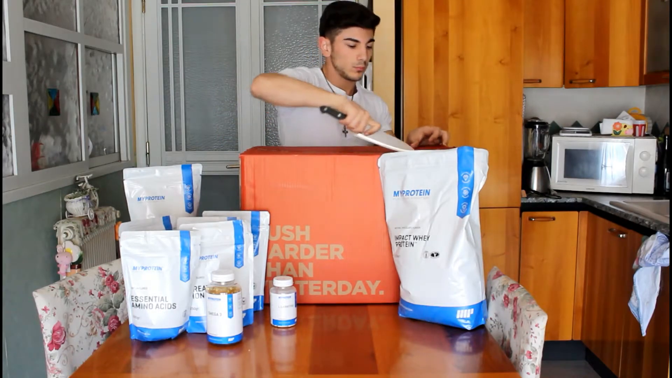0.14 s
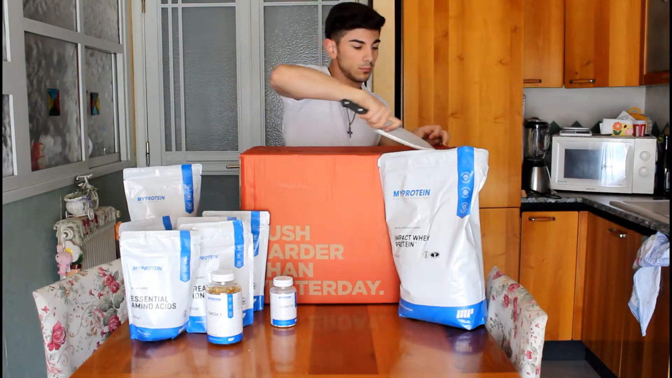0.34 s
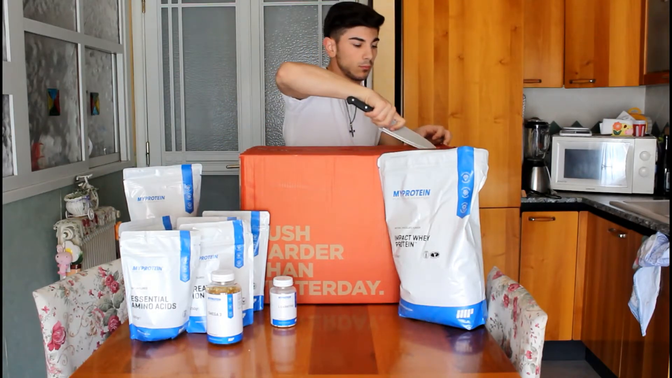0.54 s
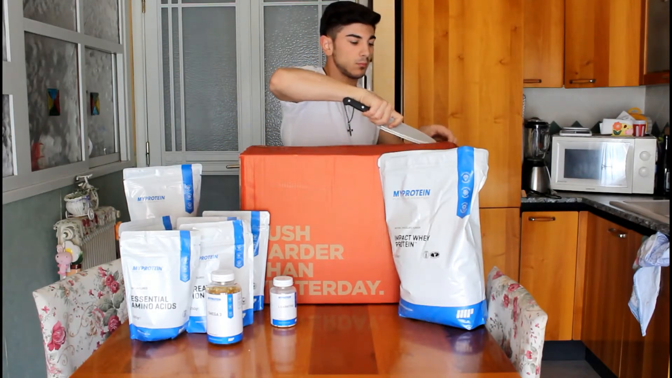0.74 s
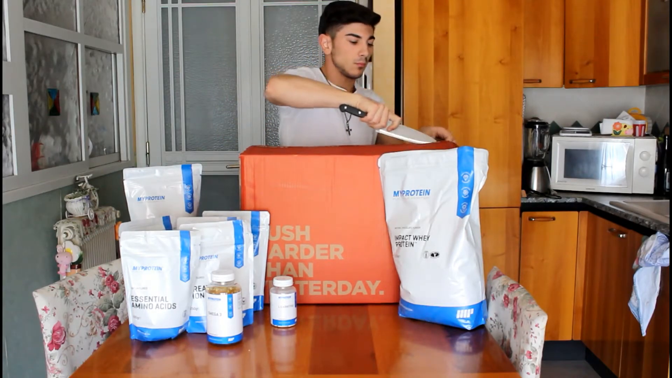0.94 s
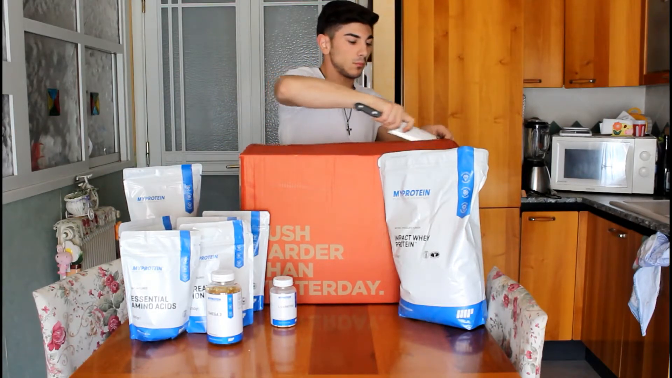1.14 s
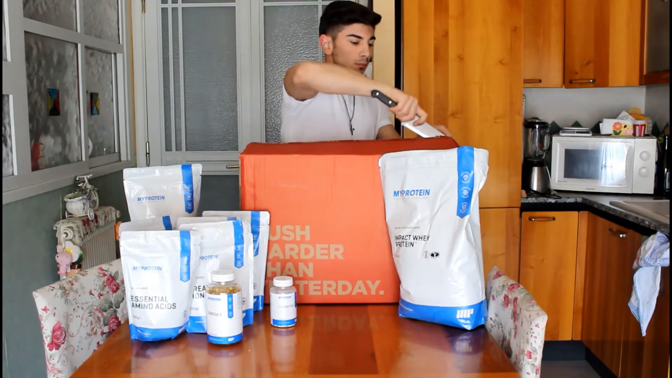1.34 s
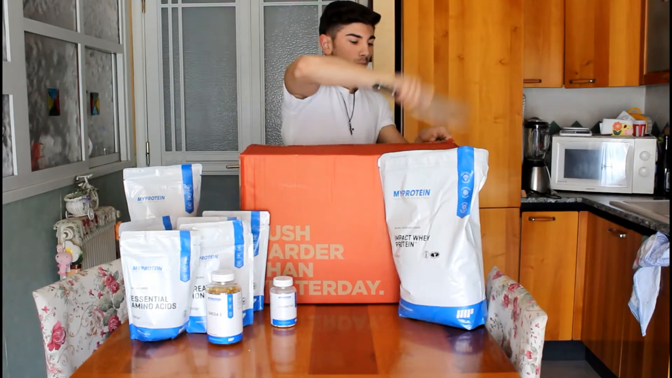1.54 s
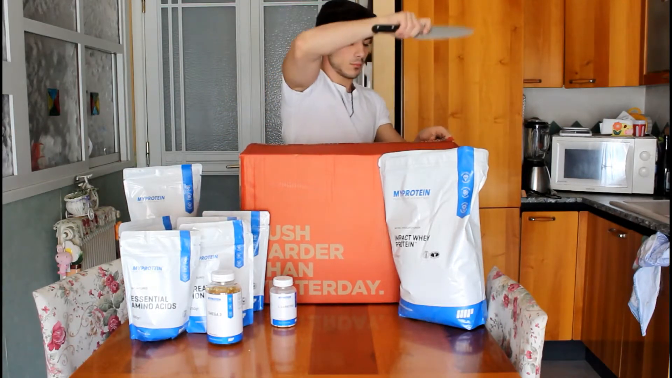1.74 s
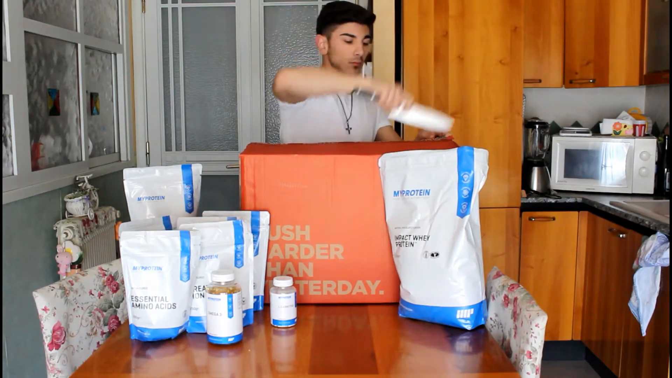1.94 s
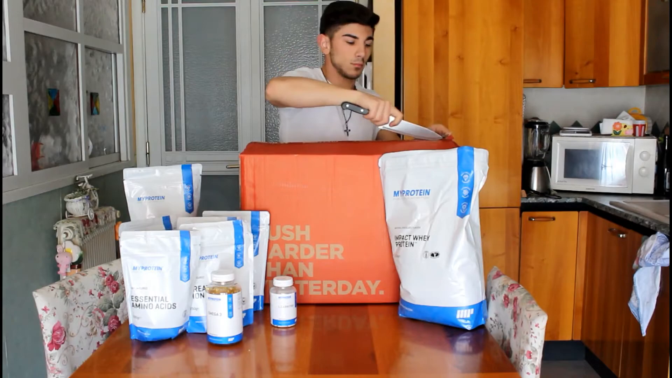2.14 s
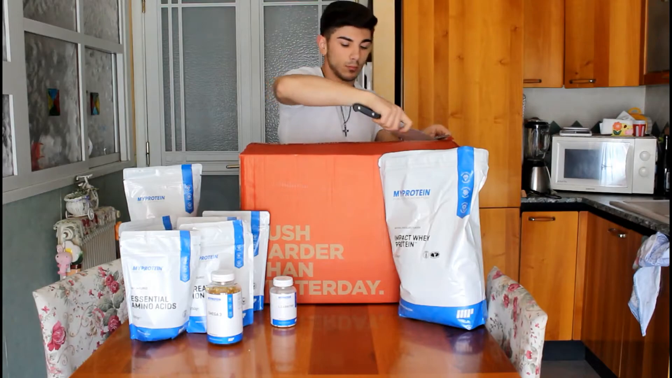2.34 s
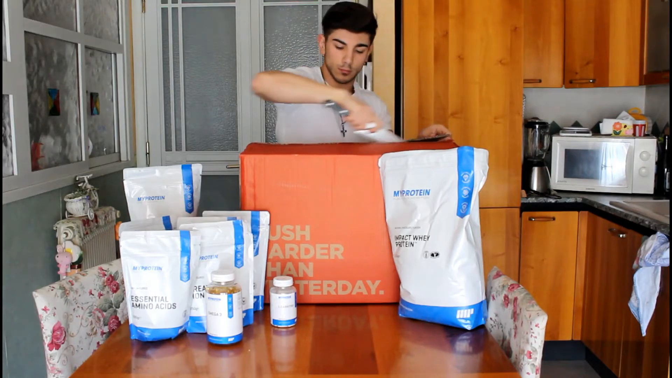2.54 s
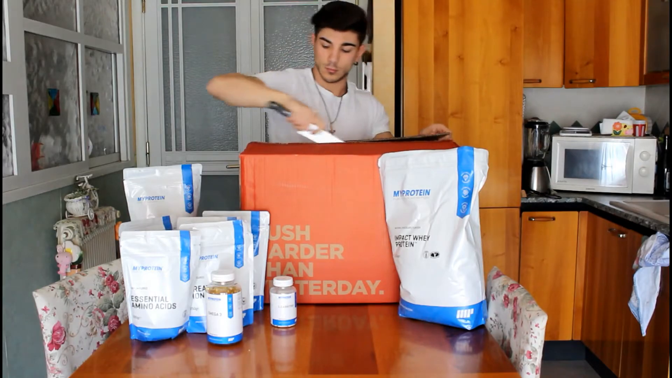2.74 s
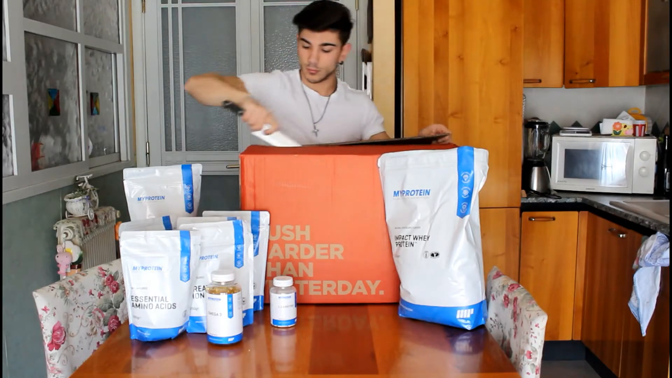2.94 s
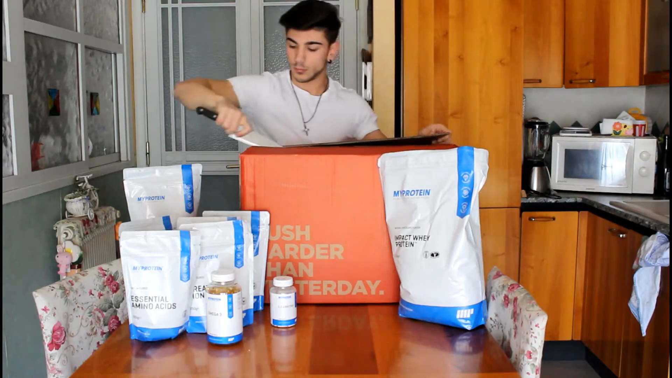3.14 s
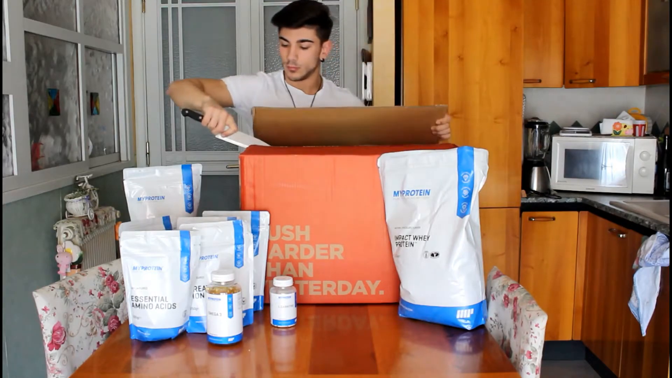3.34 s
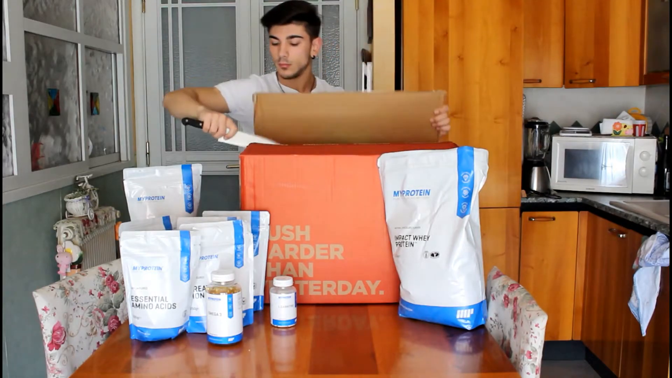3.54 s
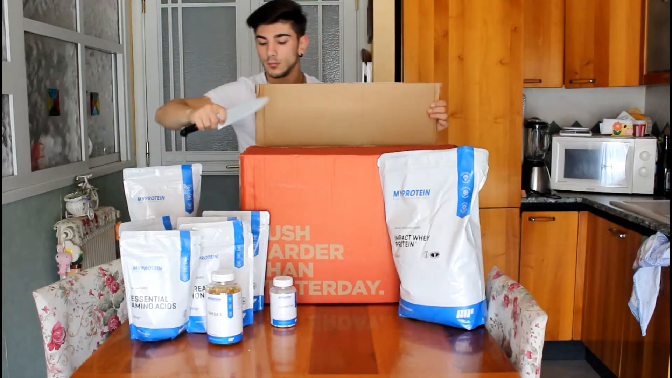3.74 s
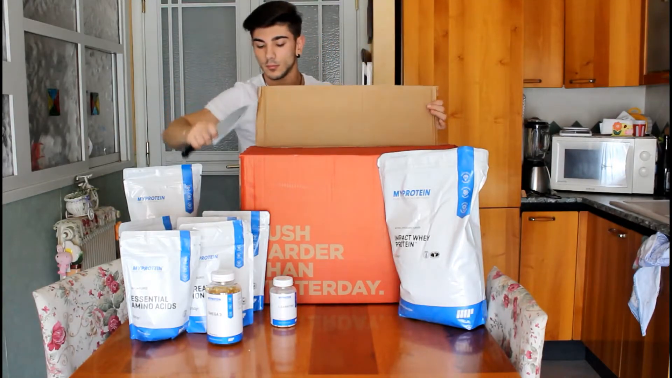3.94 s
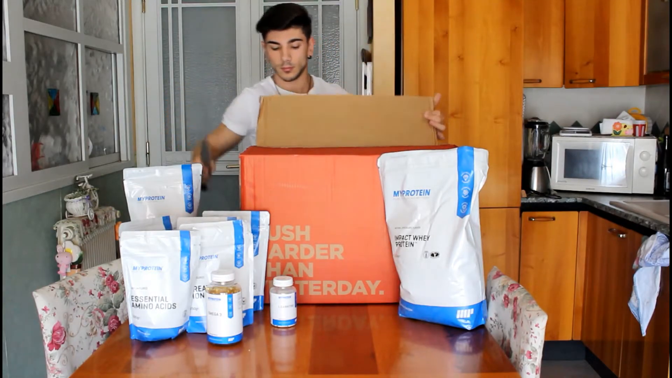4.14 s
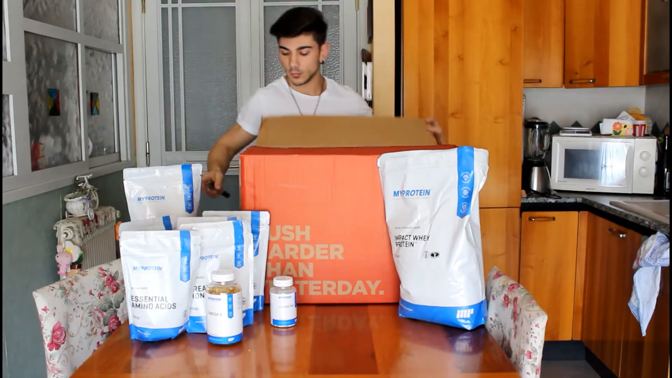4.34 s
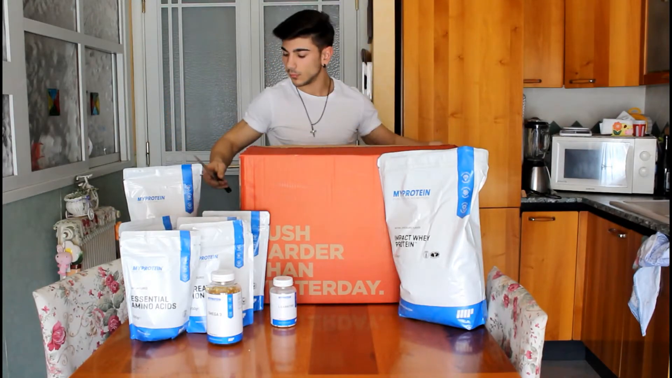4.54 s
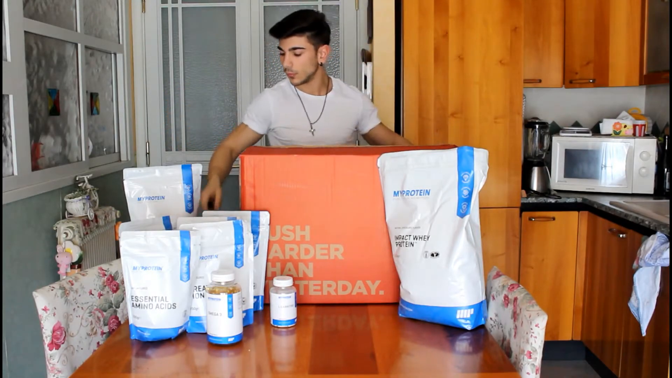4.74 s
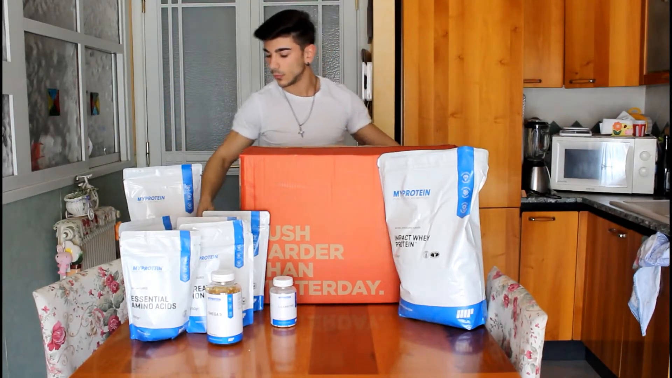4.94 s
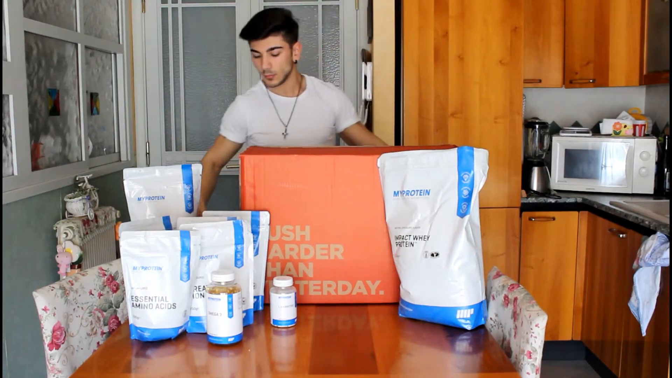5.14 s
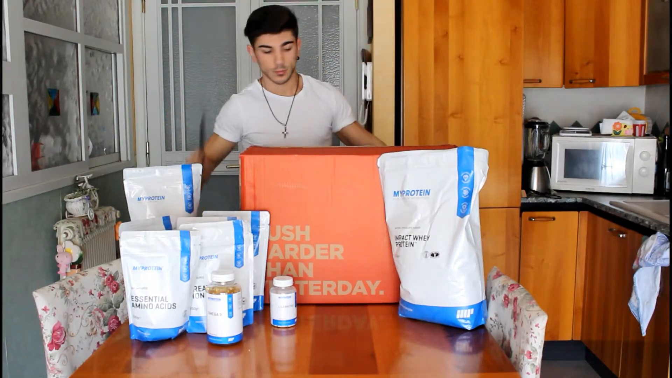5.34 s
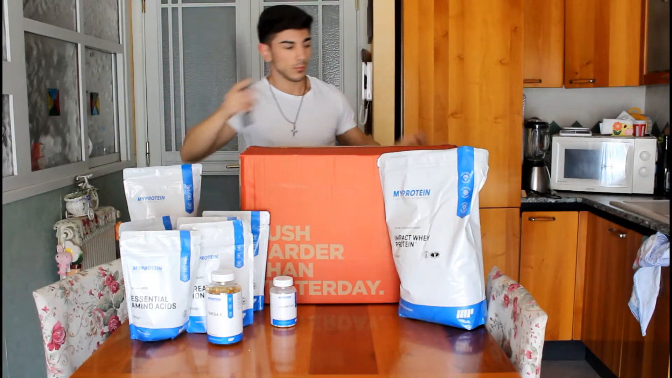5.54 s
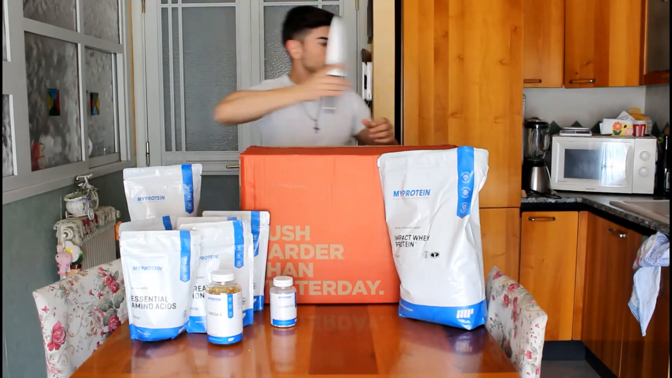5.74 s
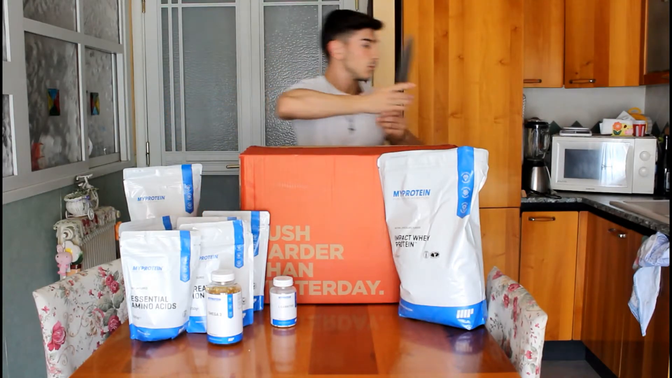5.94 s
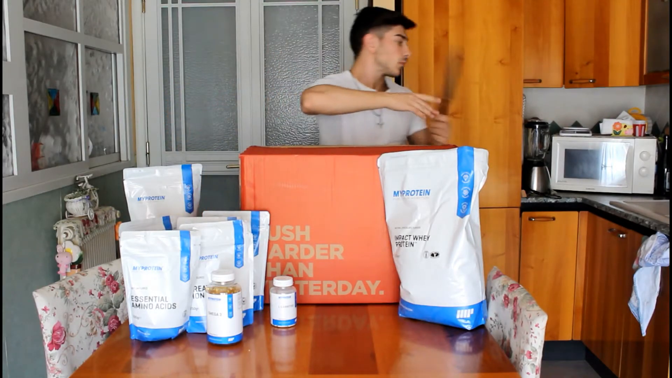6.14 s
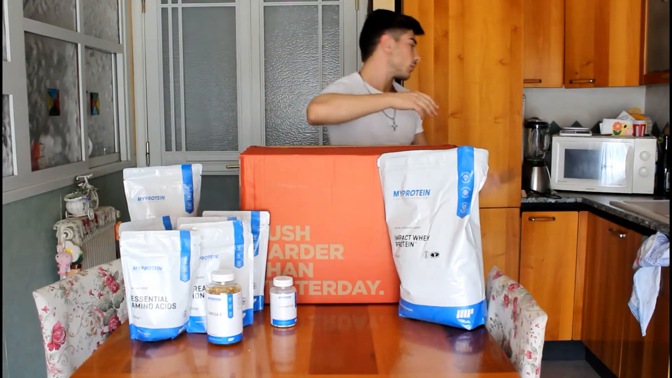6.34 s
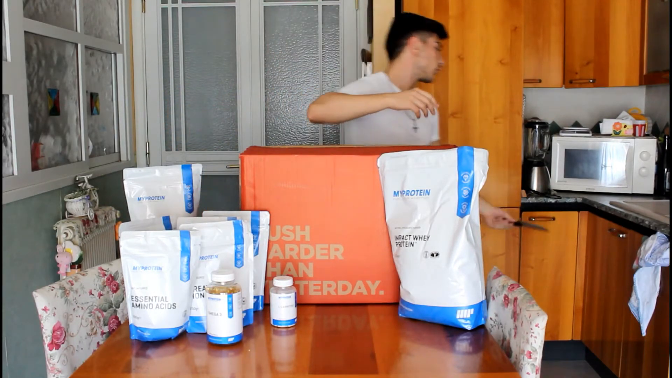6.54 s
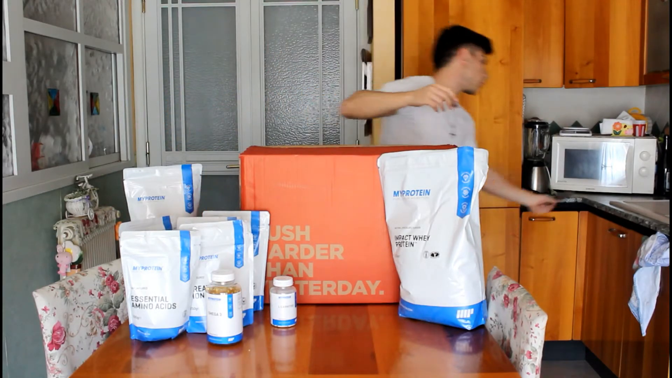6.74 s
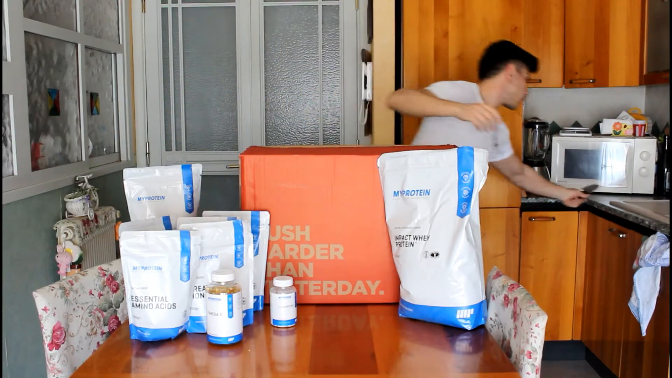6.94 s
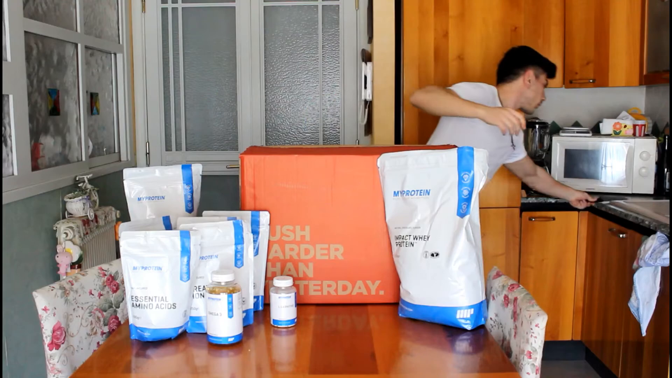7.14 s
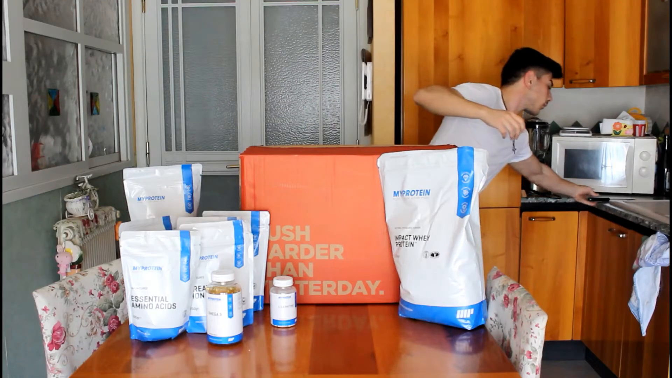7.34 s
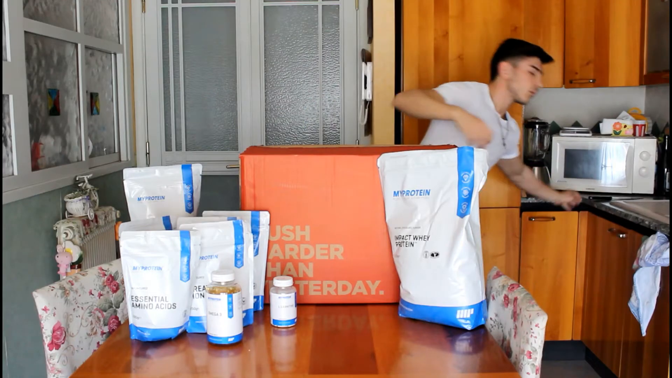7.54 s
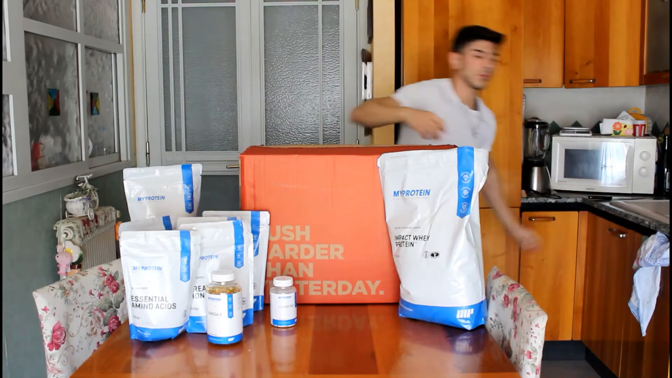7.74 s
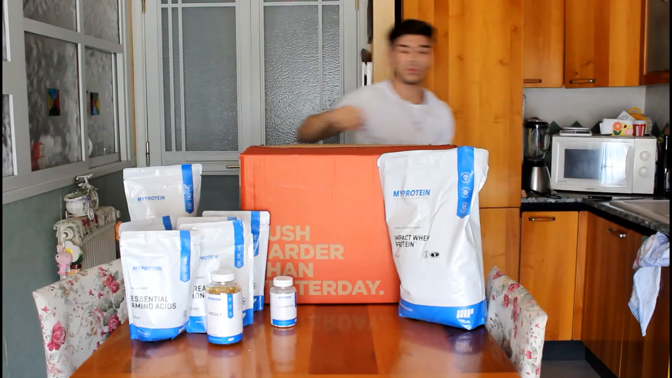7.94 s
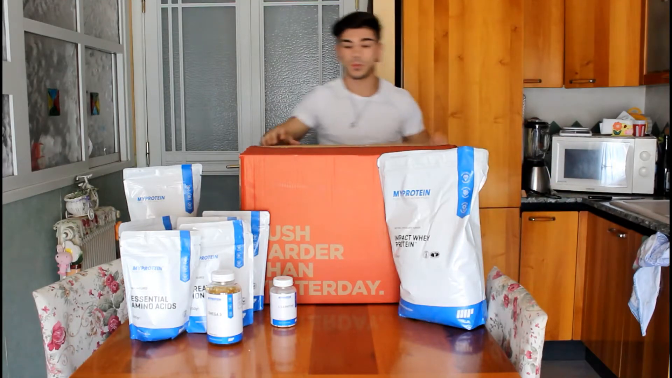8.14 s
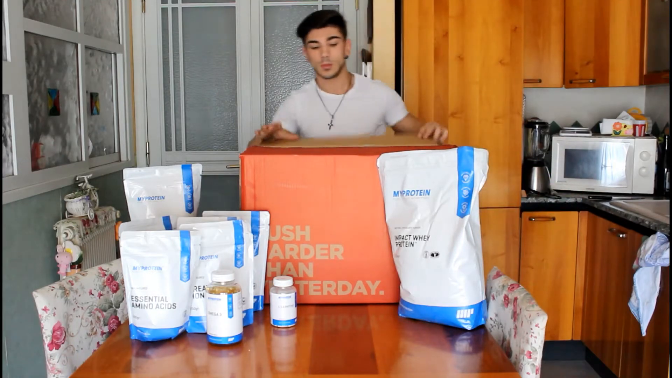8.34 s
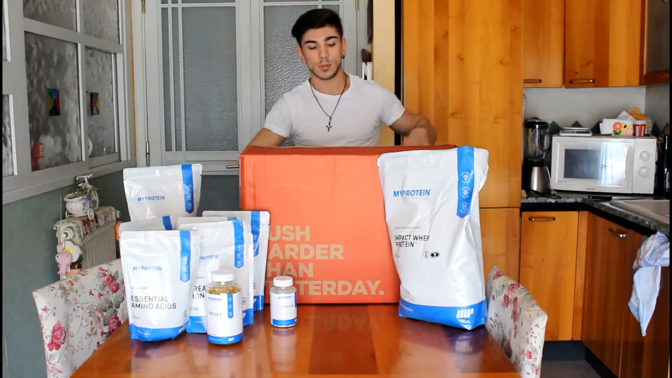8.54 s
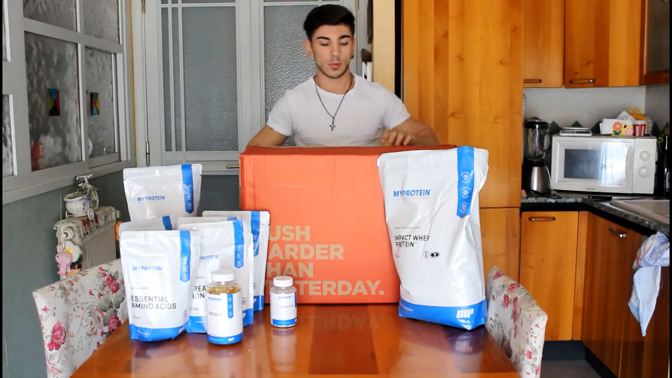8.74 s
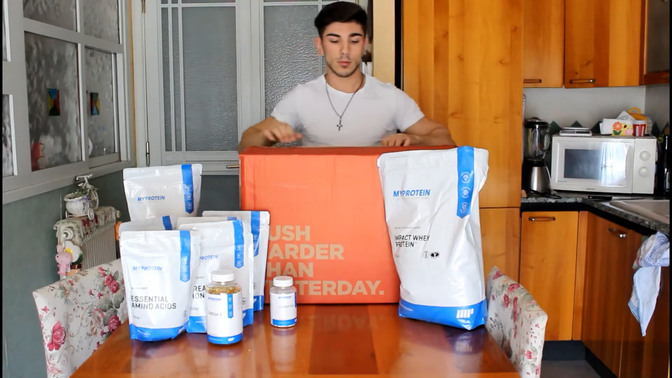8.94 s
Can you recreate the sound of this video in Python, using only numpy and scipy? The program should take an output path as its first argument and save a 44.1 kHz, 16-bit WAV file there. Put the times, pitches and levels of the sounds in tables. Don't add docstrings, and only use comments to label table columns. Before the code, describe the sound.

Loud, abrupt knife blows on a large carton come first, then a dense burst of ripping cuts. Handling drops to quiet rustles and small taps. A hard steel-on-stone clack follows, with rattling rebounds and a short scrape, then hollow cardboard thumps. Heard from about two metres in a reverberant kitchen, over soft room air, faint fridge hum and a passing low engine drone.

```python
import sys
import numpy as np
from scipy import signal
from scipy.fft import rfft, irfft
from scipy.io import wavfile
from scipy.ndimage import uniform_filter1d

SR = 44100
rng = np.random.default_rng(int(sys.argv[2]) if len(sys.argv) > 2 else 0)


def amplitude_ratio(level_db):
    exponent = np.asarray(level_db, float) / 20
    return 10 ** exponent


def file_out(sig):
    cols = np.atleast_2d(sig).T
    lim = np.clip(cols, -1, 1)
    pcm = np.round(lim * 32767).astype(np.int16)
    wavfile.write(sys.argv[1], SR, pcm)


N = 400993

# (time [s], peak [dB], weight [dB], sharpness [dB], crunch length [s])
KNIFE_BLOWS = [(0.4094, -3.5, 3, 0.5, 0.013), (0.428, -10.5, -8, 0, 0.016), (0.45, -15.5, 2.5, 0, 0.007),
               (0.7382, -29.5, 10, -22, 0.01), (0.896, -18, -9.5, -10.5, 0.0068),
               (1.099, -4.5, -6, -1.5, 0.024), (1.215, -11.5, 0.5, -14, 0.022),
               (1.558, -10, 6.5, 0.5, 0.033), (1.9, -54, -15, -23, 0.014),
               (2.0418, -19.5, 8.5, -15.5, 0.02), (2.239, -19, 9, 2.5, 0.027), (2.395, -6.5, -5, -7, 0.017),
               (2.552, -14.5, 8, -1, 0.027), (2.889, -12, 10.5, -4, 0.021), (3.612, -32, 12, -1.5, 0.019),
               (8.175, -19.5, 20.5, 0.5, 0.01), (8.195, -22.5, 17, 9, 0.009),
               (8.458, -25, 15.5, 1.5, 0.027), (8.811, -27, 10, -9.5, 0.023)]
# (start [s], length [s], level [dB], weight [dB], sharpness [dB])
KNIFE_CUTS = [(0, 0.082, -42.5, -6, -3), (0.045, 0.25, -38.5, 0, -3), (0.266, 0.34, -34.5, 1, 4),
              (0.472, 0.18, -27.5, -4.5, -8), (0.717, 0.11, -36, 2, -1), (0.887, 0.2, -37.5, -5, -1),
              (1.125, 0.061, -22, -4.5, -17), (1.171, 0.077, -22.5, 2.5, 1), (1.586, 0.024, -44, 6, 21),
              (1.887, 0.052, -46, -16, -23), (2.256, 0.051, -21, 1, -5), (2.415, 0.19, -23, -5, -6),
              (2.504, 0.041, -17.5, 2, -2.5), (2.544, 0.15, -16.5, 4.5, -5), (2.674, 0.27, -21, 3, -1),
              (2.888, 0.16, -18.5, 3.5, -4), (3.085, .15, -26.5, 7.5, -0.5),
              (3.251, 0.037, -22.5, 3.5, -2.5), (6.225, 0.088, -38.5, -18, 6), (8.176, 0.18, -30.5, 2, 0),
              (8.307, 0.25, -33, 3, 3), (8.77, .04, -46, 5, 10), (8.825, 0.089, -30.5, 3.5, 1),
              (8.961, 0.3, -39.5, -2, 1)]
# (time [s], peak [dB], weight [dB], sharpness [dB], length [s])
SOFT_BUMPS = [(1.566, -17, 6, -12, 0.019), (8.177, -22, 13, -5, 0.037), (4.098, -35.5, -7, -11, 0.017),
              (4.927, -38.5, 0.5, -22, 0.016), (5.5738, -23, -10, 3, 0.0061),
              (5.8974, -19, -2.5, -14, 0.031), (6.1913, -25.5, 0.5, -22, 0.026),
              (6.531, -38.5, -5, -30, 0.019), (6.609, -37.5, -7, -35, 0.04),
              (6.767, -36.5, 10.5, -17, 0.031), (7.936, -34, 4, -49, 0.024)]
# (start [s], length [s], level [dB], weight [dB], sharpness [dB])
HAND_BRUSHES = [(3.4, 0.4, -42, 0, 0), (3.691, 0.058, -40, -20, 5), (3.79, 0.16, -46.5, -9, 3),
                (4.1, 0.068, -45.5, -14, 4.5), (4.22, 0.14, -43.5, -16, -0.5), (4.3, 0.11, -41, -0.5, 3),
                (4.575, .04, -51.5, -8, 6), (4.64, 0.14, -55.5, -11, 4), (4.837, .06, -56, -6, 6),
                (4.918, .04, -45, 1, -9), (5.44, .05, -51, -8, 7), (5.493, .07, -39, -8, 5),
                (5.535, 0.073, -32.5, -3.5, 2), (5.66, .16, -42, -1, 6.5), (5.792, 0.19, -39.5, 3, 7),
                (6.117, .06, -48, -6, -7), (7.94, 0.054, -40.5, -5, -27), (8.024, .1, -46.5, -12, -5),
                (8.147, 0.044, -38.5, 2, 0)]
# (level [dB], share of weight [dB/dB], share of sharpness [dB/dB])
CUT_PARTS = [
    (1, 0, -0.066),
    (-1, 1, -0.34),
    (-2.5, 0.51, -0.35),
    (0, 0.1, 0.69),
]
# (level [dB], share of weight [dB/dB], share of sharpness [dB/dB])
FLAP_PARTS = [
    (0.5, 0.12, 0.019),
    (-2.5, 1, -0.014),
    (-0.5, 0.81, -0.17),
    (0.5, 0.057, 0.99),
]
# (frequency [Hz], width [Hz], level [dB])
BOX_AIR = [(113.8, 43.5, -14.5), (157.7, 25.4, -7), (183, 30, -0.5), (202.4, 20.3, -2), (248.2, 25, -9.5),
           (294.7, 37, -8.5)]
# (frequency [Hz], width [Hz], level [dB])
BOX_WALLS = [(383, 146, 0.8), (520, 148, -2.1), (630, 215, 0.082), (806, 180, -2.1)]
# (frequency [Hz], width [Hz], level [dB])
BOX_PANELS = [(1132, 400, 2), (1405, 790, 0.5), (1630, 840, -3.5), (2254, 480, -0.5)]
# (frequency [Hz], width [Hz], level [dB])
TAPE_CRACKLE = [(3065, 1350, -1.5), (4470, 1630, -3), (6380, 2150, -6), (8940, 3100, -11.5),
                (11900, 1300, -21.5)]
# (frequency [Hz], width [Hz], level [dB])
SLEEVE_RUSTLE = [(2380, 1200, 3.5), (4000, 4000, 2), (6130, 3600, 2.5), (9400, 2300, -4.5),
                 (12300, 3000, -19)]

# (time [s], peak [dB], weight [dB], sharpness [dB], rattle length [s])
KNIFE_BOUNCES = [
    (7.1793, 0, -5.5, -18, 0.011),
    (7.221, -14, -3.5, -24, 0.011),
    (7.3283, -15, 7, 1, 0.021),
    (7.461, -24, 1, 5.5, 0.012),
    (7.4745, -13, 7, -7, 0.0071),
    (7.516, -15.5, 0, 1.5, 0.014),
    (7.5705, -21.5, 2.5, 3, 0.016),
    (7.6594, -41, 3, -6, 0.012),
]
# (start [s], length [s], level [dB], weight [dB], sharpness [dB])
KNIFE_SLIDES = [(7.2, .13, -25, -5, -19), (7.346, 0.065, -29, 0, -5), (7.413, .14, -25, 2, -14),
                (7.557, 0.13, -36, 9, -8.5), (7.716, 0.074, -47.5, 12.5, -23)]
# (level [dB], share of weight [dB/dB], share of sharpness [dB/dB])
KNIFE_PARTS = [
    (0.5, 0, 0.028),
    (2, 0.84, 0),
    (-1, 0.093, 0.82),
    (-7, 0.55, 0.61),
]
# (frequency [Hz], width [Hz], level [dB])
SLAB_CLACK = [(2050, 1040, 6), (2360, 400, 1.5), (3060, 900, -2.5)]
# (frequency [Hz], width [Hz], level [dB])
COUNTER_THUD = [(118.4, 51, 2.5), (202.4, 54, 5), (324, 230, -2.5), (536, 360, 2), (790, 280, 5),
                (1180, 460, 0.5), (1615, 195, 3)]
# (frequency [Hz], width [Hz], level [dB])
STEEL_RASP = [(4140, 2300, 2.5), (6500, 1050, 0), (9500, 2600, -2.5), (11500, 1800, -6)]
# (frequency [Hz], width [Hz], level [dB])
BLADE_TONES = [(3953, 35, 3), (4470, 50, 0), (4870, 72, 0), (5330, 40, -7), (5635, 50, 2), (6660, 49, 0),
               (7000, 47, 0), (8320, 52, 1.5), (8800, 65, -5), (9640, 40, 2), (10160, 60, 1),
               (11500, 60, -5), (13250, 40, -4), (15200, 40, -11)]

# (frequency [Hz], time to fall 60 dB [s])
KITCHEN_DECAY = [(125, 0.37), (500, 0.83), (1500, 0.69), (4000, 0.72), (8000, 0.57), (14000, 0.22)]
# (frequency [Hz], width [Hz], level [dB])
FRIDGE_TONES = [(138.6, 13, -46.5), (272, 11, -58), (354.8, 19.5, -51), (411.7, 10, -53.5), (497, 8.7, -61)]
# (time [s], drone [Hz], level [dB])
VEHICLE_DRONE = [(0, 54.8, -56), (.86, 54.7, -48), (1.5, 55.3, -51), (2.4, 56, -53), (3.9, 52.5, -60),
                 (4.76, 55.6, -51), (5.3, 58, -40.5), (5.6, 58.8, -40.5), (6.2, 60, -29.5),
                 (6.45, 62.7, -32), (6.7, 62.5, -48), (6.92, 64, -39), (7.3, 64, -51), (8.1, 66.5, -51),
                 (8.7, 66, -46), (9.09, 65, -38)]
# (frequency [Hz], level per Hz [dB])
ROOM_AIR = [(17, -8.5), (45, -7.5), (74, -11), (137, -8.5), (330, -9.5), (950, -19.5), (6720, -32.5),
            (15500, -52.5)]
# (frequency [Hz], level [dB])
WHINE = [(6681, -72)]


def box():
    cutting = amplitude_ratio(-5.0) * force(KNIFE_BLOWS, KNIFE_CUTS, CUT_PARTS, rise=0.3, patchy_db=2.0)
    handling = amplitude_ratio(-5.5) * force(SOFT_BUMPS, HAND_BRUSHES, FLAP_PARTS, rise=0.12, patchy_db=0.5)
    coarse = grit(7000, spread_db=3.0)
    fine = grit(15000, spread_db=3.0)
    cut_card = card(cutting, KNIFE_BLOWS, BOX_PANELS, TAPE_CRACKLE, coarse)
    moved_flaps = card(handling, SOFT_BUMPS, BOX_PANELS[:-1], SLEEVE_RUSTLE, fine)
    return cut_card + moved_flaps


def card(strength, hits, panels, surface, slips):
    panel_force, air_force, wall_force, surface_force = strength
    thumps = pushed(grit(700, spread_db=2.5), hits, firm_db=34)
    boom = struck(air_force, thumps, rings(BOX_AIR))
    walls = struck(wall_force, thumps + level(slips), humps(BOX_WALLS))
    panel = struck(panel_force, slips, humps(panels))
    crackle = struck(surface_force, np.roll(slips[::-1], 1), humps(surface))
    return boom + walls + panel + crackle


def knife():
    strength = amplitude_ratio(-2.5) * force(KNIFE_BOUNCES, KNIFE_SLIDES, KNIFE_PARTS, rise=0.13, patchy_db=4.0)
    clack_force, thud_force, rasp_force, blade_force = strength
    chatter = grit(6000, spread_db=3.0)
    clack = struck(clack_force, chatter, humps(SLAB_CLACK))
    thud = struck(thud_force, chatter[::-1], humps(COUNTER_THUD))
    rasp = struck(rasp_force, chatter[::-1], humps(STEEL_RASP))
    blade = struck(blade_force, pushed(chatter, KNIFE_BOUNCES, firm_db=14), rings(BLADE_TONES))
    return clack + thud + rasp + blade


def force(hits, strokes, parts, rise, patchy_db):
    swell_share, sag_db_per_s, release_db_per_s = 0.24, 28.5, 146
    t = np.arange(N) / SR
    base_db, by_weight, by_edge = np.transpose(parts)
    bursts, drags = np.zeros((2, 4, N))

    for time, db, weight, edge, length in hits:
        start = int((time - .003) * SR)
        length = max(length, .002)
        age = t[1:min(N - start, SR // 2) + 1]
        swell = (1 - np.exp(-age / (rise * length))) ** 2
        shape = swell * np.exp(-age / length)
        gains = amplitude_ratio(db + base_db + by_weight * weight + by_edge * edge)
        bursts[:, start:start + len(age)] += (gains[:, None] * shape) ** 2

    for time, length, db, weight, edge in strokes:
        start = int(time * SR)
        age = t[:min(N - start, SR)]
        fall_db = sag_db_per_s * age + release_db_per_s * np.maximum(age - length, 0)
        swell = np.minimum(age / (swell_share * length), 1)
        shape = swell * amplitude_ratio(-fall_db)
        gains = amplitude_ratio(db + base_db + by_weight * weight + by_edge * edge)
        drags[:, start:start + len(age)] += (gains[:, None] * shape) ** 2

    unevenness = amplitude_ratio(patchy_db * walk(30))
    return np.sqrt(bursts + drags * unevenness ** 2)


def grit(per_s, spread_db):
    happens, rarity, side = rng.random((3, N))
    size = amplitude_ratio(-spread_db * np.log(1 - rarity))
    return (happens < per_s / SR) * size * np.sign(side - .5)


def pushed(fine, hits, firm_db):
    out = level(fine)
    moments = (np.array(hits)[:, 0] * SR).astype(int)
    out[moments] += amplitude_ratio(firm_db)
    return out


def struck(strength, clicks, body):
    unit_body = body / np.sqrt(np.sum(body ** 2))
    return signal.oaconvolve(strength * level(clicks), unit_body)[:N]


def rings(modes):
    age = np.arange(SR // 2) / SR
    out = 0
    for k, (hz, width, db) in enumerate(modes):
        gain = (-1) ** k * amplitude_ratio(db) * np.sqrt(width)
        decay = np.exp(-np.pi * width * age)
        onset = np.tanh(hz * age)
        out = out + gain * decay * np.sin(2 * np.pi * hz * age) * onset
    return out


def humps(modes, size=8192):
    f = np.fft.rfftfreq(size, 1 / SR) + 1
    power = 0
    for hz, width, db in modes:
        detune = (f - hz ** 2 / f) / width
        power = power + amplitude_ratio(db) ** 2 / (1 + detune ** 2) ** 2
    cepstrum = irfft(np.log(power + 1e-12))[:size // 2]
    cepstrum[0] /= 2
    return irfft(np.exp(rfft(cepstrum, size)))[:size // 4]


def level(x, db=0):
    return x * amplitude_ratio(db) / np.sqrt(np.mean(x ** 2))


def walk(rate):
    hold = int(SR / rate)
    steps = np.repeat(rng.standard_normal(N // hold + 1), hold)
    smooth = uniform_filter1d(uniform_filter1d(steps, hold), hold)
    return 1.07 * smooth[:N]


def kitchen(x):
    shares = np.array([walk(14) for _ in range(4)])
    shares /= np.sqrt(np.sum(shares ** 2, axis=0))
    return x + sum(signal.fftconvolve(x * share, echo())[:N] for share in shares)


def echo():
    wet_db, fill_s, early_db, early_s = 0.5, 0.0027, 7.5, 0.023
    age = np.arange(int(1.2 * SR)) / SR
    hz, t60 = np.transpose(KITCHEN_DECAY)
    tail = 0
    for centre in 60 * 2 ** np.arange(0, 8.1, .5):
        band = narrow(centre, centre / 3, count=len(age))
        ring_s = np.interp(np.log(centre), np.log(hz), t60)
        tail = tail + band * amplitude_ratio(-60 * age / ring_s)
    fill = 1 - np.exp(-age / fill_s)
    early = amplitude_ratio(early_db * np.exp(-age / early_s))
    tail = tail * fill * early
    return amplitude_ratio(wet_db) * tail / np.sqrt(np.sum(tail ** 2))


def background():
    return room_air() + fridge() + whine() + vehicle()


def room_air():
    f = np.fft.rfftfreq(N, 1 / SR) + 1
    hz, db = np.transpose(ROOM_AIR)
    colour = amplitude_ratio(np.interp(np.log(f), np.log(hz), db))
    air = irfft(rfft(rng.standard_normal(N)) * colour, N)
    return level(air, -43.5) * amplitude_ratio(1.0 * walk(3.764))


def fridge():
    out = 0
    for hz, width, db in FRIDGE_TONES:
        out = out + level(narrow(hz, width, count=N), db) * amplitude_ratio(1.3 * walk(3.2))
    return out


def whine():
    hz, db = WHINE[0]
    t = np.arange(N) / SR
    return np.sqrt(2) * amplitude_ratio(db + 2.8 * walk(35)) * np.sin(2 * np.pi * hz * t)


def vehicle():
    time, hz, db = np.transpose(VEHICLE_DRONE)
    t = np.arange(N) / SR
    pitch = np.interp(t, time, hz) * (1 + 0.0098 * walk(13))
    phase = 2 * np.pi * np.cumsum(pitch) / SR
    return np.sqrt(2) * amplitude_ratio(np.interp(t, time, db) + 0.5 * walk(29)) * np.sin(phase)


def narrow(hz, width, count):
    b, a = signal.iirpeak(hz, hz / width, fs=SR)
    once = signal.lfilter(b, a, rng.standard_normal(count))
    return signal.lfilter(b, a, once)


def scene():
    no_deep_bass = signal.butter(2, 90, "high", fs=SR, output="sos")
    near = signal.sosfilt(no_deep_bass, box() + knife())
    return (kitchen(near) + background())[None]


def top_cut(x):
    return signal.sosfilt(signal.butter(12, 15780, fs=SR, output="sos"), x)


def record(dry):
    mic_top_hz = 13900
    heard = signal.sosfilt(signal.butter(4, mic_top_hz, fs=SR, output="sos"), dry)
    rounded = 1.124 * np.tanh(heard / 1.118)
    return top_cut(rounded)


dry = scene()
out = record(dry)
file_out(out)
```